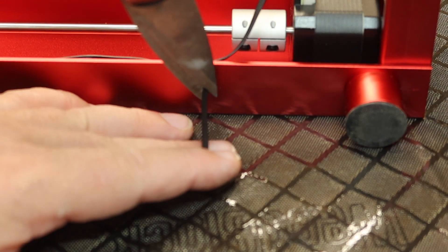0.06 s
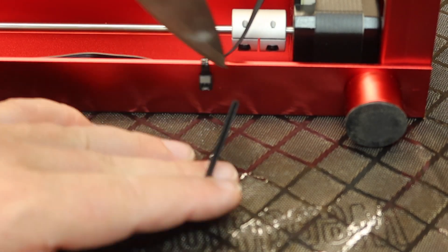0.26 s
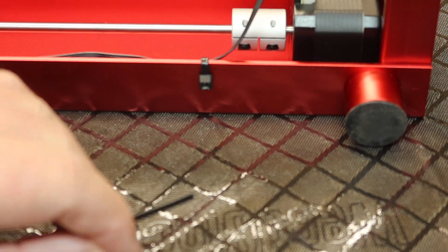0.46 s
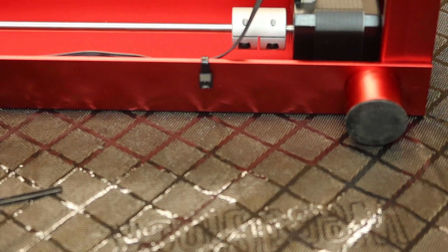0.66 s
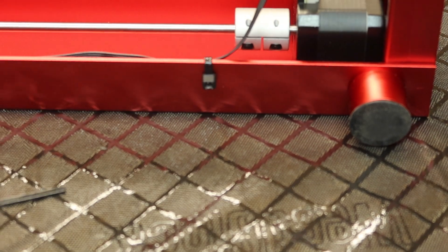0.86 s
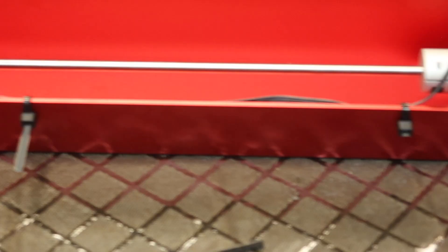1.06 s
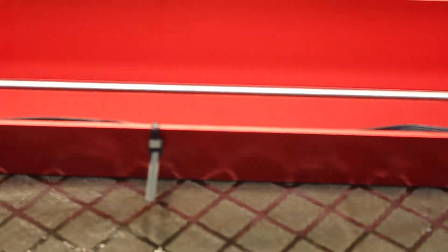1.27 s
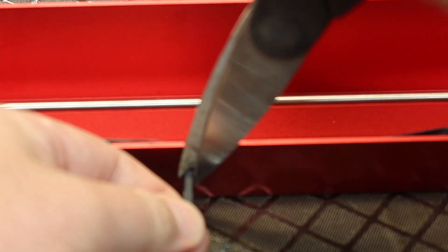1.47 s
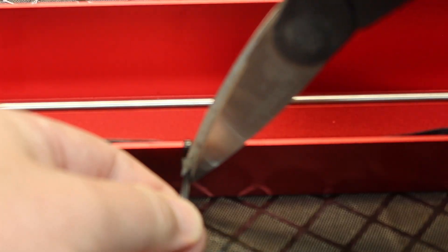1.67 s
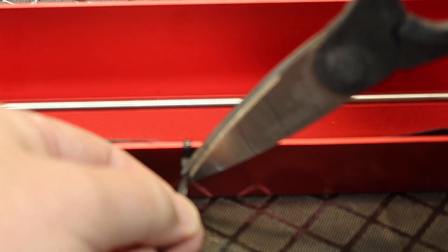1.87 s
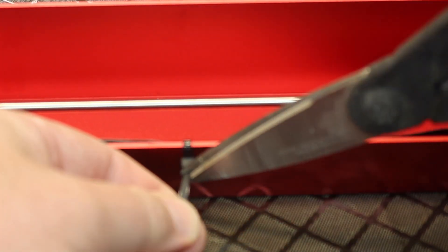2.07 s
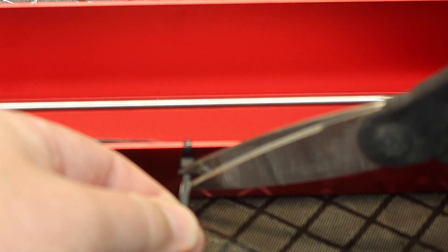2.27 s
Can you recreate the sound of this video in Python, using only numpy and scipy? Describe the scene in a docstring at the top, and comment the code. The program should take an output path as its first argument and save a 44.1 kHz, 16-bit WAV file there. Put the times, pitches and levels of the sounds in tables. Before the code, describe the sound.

Scissors snip a plastic zip tie with a sharp snap at 0.2 seconds, then knock briefly. A hand rubs softly over a cloth mat from about 0.5 seconds, with a few dry ticks. From 0.9 to 1.3 seconds the microphone's mount scrapes, judders and squeaks, stopping with a clunk at 1.4. Around 2 seconds the blades crunch faintly into another tie. Everything is close, in a small quiet room.

```python
"""Scissors snip a plastic zip tie on a metal frame, close to a camera's microphone in a small quiet room.
The blades squeeze, snap through and knock; a hand slides away over a cloth mat; the camera mount is
swung round with a juddering scrape and a clunk; fingers take the next tie and the blades bite into it.
Blows are a crack plus ringing modes, friction is a stream of tiny slips.
The recorder's limiter ducks the room after each loud sound."""
import sys
import numpy as np
from scipy import signal
from scipy.fft import rfft, irfft
from scipy.io import wavfile
from scipy.ndimage import uniform_filter1d, minimum_filter1d

SR = 44100
rng = np.random.default_rng(int(sys.argv[2]) if len(sys.argv) > 2 else 0)


def store_pcm(level_fs):
    """Save levels as 16-bit WAV."""
    pcm = np.round(np.clip(level_fs, -1, 1) * 32767).astype(np.int16)
    wavfile.write(sys.argv[1], SR, np.atleast_2d(pcm).T)


N = 101429
T = np.arange(N) / SR


# the ring of the cut, close to the microphone (frequency [Hz], level [dB], t60 [s])
CUT_MODES = [(110, -13, .012), (830, -12, .035), (1430, 1, .011), (1840, -4, .008), (2950, -5, .006),
             (4120, 3, .008), (4600, 2, .007), (6000, -5, .006), (6770, -5, .005)]
# the bright snap of the plastic (frequency [Hz], level [dB])
SNAP_SPECTRUM = [(5000, -17), (8000, -3), (10500, -8), (13000, -7.5), (15000, -30), (16000, -44)]
def snip():
    """The tie tears through with a ringing blow and a bright snap."""
    cut = blow(.2032, CUT_MODES, db=-22, rise_s=.0004, crack_db=-7, crack_s=.0006, hold_s=.0018)
    snap = amp(-27) * dying(T[:SR // 50], hold_s=.001, decay_s=.0006)
    add(cut, .2033, colour(snap * rng.standard_normal(len(snap)), SNAP_SPECTRUM))
    return cut


# the scissors' ring (frequency [Hz], level [dB], t60 [s])
SCISSOR_MODES = [(460, -8, .045), (620, -6, .04), (980, -8, .04), (1105, -4, .046), (1755, -3, .032),
                 (1885, -5, .036), (2010, -3, .04), (2185, -5, .025), (3080, -2, .018), (3950, -6, .022),
                 (5590, -8, .026), (5820, -11, .02), (8450, -19, .02), (10300, -15, .006),
                 (12400, -21, .005)]
# their rebounds at the frame (time [s], level [dB], relative crack level [dB])
REBOUNDS = [(.2937, -28, 4), (.29642, -35, 5), (.30275, -41, 2)]
def knocks():
    """The freed scissors knock and chatter to rest."""
    return sum(blow(s, SCISSOR_MODES, db, rise_s=.0001, crack_db=crack_db, crack_s=.004)
               for s, db, crack_db in REBOUNDS)


# the crack of a hard contact at close range (frequency [Hz], level [dB])
CRACK_SPECTRUM = [(60, -34), (350, -1), (1500, 1.5), (4500, -2.5), (7000, -10.5), (11000, -20.5),
                  (16000, -51)]
def blow(s, modes, db, rise_s, crack_db, crack_s, hold_s=0):
    """One blow: a short crack and the dying modes of what was struck."""
    t, out = T[:SR // 5], np.zeros(N)
    ring = sum((-1) ** k * amp(gain) * dying(t, hold_s, t60 / np.log(1000)) * np.sin(2 * np.pi * hz * t)
               for k, (hz, gain, t60) in enumerate(modes))
    crack = colour(rng.standard_normal(len(t)) * dying(t, hold_s, crack_s), CRACK_SPECTRUM)
    onset = 1 - np.exp(-t / rise_s)
    add(out, s, amp(db) * onset * (ring + amp(crack_db) * crack))
    return out


# blade passing blade (frequency [Hz], level [dB])
SHEAR_SPECTRUM = [(100, -5), (300, 7), (850, 5), (1300, 0), (2400, 2), (4300, 1), (6500, -5), (8000, -23),
                  (16000, -39)]
def shear(start_s=.205, db=-30, decay_s=.017):
    """After the snap, steel slides on steel with a hiss that dies away."""
    stroke = np.zeros(N)
    add(stroke, start_s, amp(db) * np.exp(-T / decay_s))
    return colour(stroke * rng.standard_normal(N), SHEAR_SPECTRUM)


# blades pressing into the first tie (time [s], length [s], level [dB])
PRESSES = [(-.03, .225, -63), (.193, .012, -48)]
# their thin hiss, heard close up (frequency [Hz], level [dB])
BLADE_SPECTRUM = [(100, -12), (300, -2.5), (650, 9), (1300, -5.5), (2200, -4.5), (3300, 0.5), (6000, -6),
                  (9000, -16.5), (16000, -24)]
# their faint singing at the next tie (time [s], level [dB])
SING_LEVELS = [(2.232, -86), (2.243, -70), (2.3, -66.5)]
# their resonances when pressing and when singing (frequency [Hz], width [Hz], boost [dB])
PRESS_PEAKS = [(4200, 320, 7), (5400, 57, 2)]
SING_PEAKS = [(3915, 90, 17)]
def blades(release_s=.028):
    """Steel creeps through plastic before the cut; at the end the blades sing faintly as they rub."""
    press = sum(amp(db) * np.clip(np.minimum((T - s) * 4, s + length - T + release_s) / release_s, 0, 1)
                for s, length, db in PRESSES)
    creep = colour(press * grains(per_s=2000, spread_db=3, smooth=1), BLADE_SPECTRUM, PRESS_PEAKS)
    sing = colour(level(SING_LEVELS) * rng.standard_normal(N), BLADE_SPECTRUM, SING_PEAKS)
    return creep + sing


# the crunch into the next tie, and the catches of the edge (time [s], level [dB])
CRUNCH_LEVELS = [(1.972, -75), (1.983, -55), (1.988, -52), (2.008, -54), (2.03, -57.5), (2.05, -83)]
EDGE_CATCHES = [(1.9884, -36), (1.9906, -32), (1.9949, -29), (2.0089, -24), (2.0328, -37)]
# the tone of both (frequency [Hz], level [dB])
BITE_SPECTRUM = [(100, -2), (400, 8), (900, 3.5), (2000, 5), (4500, -0.5), (7000, -11.5), (11000, -19),
                 (16000, -28)]
def bite():
    """The blades crunch into the next tie, their edge catching in dry snicks."""
    friction = level(CRUNCH_LEVELS) * grains(per_s=1700, spread_db=2.5, smooth=.34)
    for s, db in EDGE_CATCHES:
        add(friction, s, amp([db]))
    return colour(friction, BITE_SPECTRUM)


# small contacts near the microphone (time [s], level before the low cut [dB], low cut [Hz], decay [s])
CONTACTS = [(0.82, -37, 2000, 0.0015), (0.873, -38, 6500, 0.018), (0.9325, -28.5, 4800, 0.0032),
            (1.399, -27.5, 6440, 0.0024), (1.562, -44, 3000, .002), (1.621, -43, 2500, .001)]
# their tone (frequency [Hz], level [dB])
TICK_SPECTRUM = [(200, 16), (1500, 4.5), (4500, 0), (7000, -9.5), (11000, -16.5), (16000, -41)]
def ticks():
    """Plastic and blade touch in brief dry ticks."""
    t, out = T[:SR // 20], np.zeros(N)
    for s, db, low_hz, decay_s in CONTACTS:
        burst = colour(rng.choice([-1, 1], len(t)) * np.exp(-t / decay_s), TICK_SPECTRUM)
        low_cut = signal.butter(2, low_hz, "high", fs=SR)
        add(out, s, amp(db) * signal.lfilter(*low_cut, burst))
    return out


# the mount sliding, right at the camera (time [s], level [dB])
SLIDE_LEVELS = [(.92, -84), (.945, -51.5), (.975, -43.5), (.99, -50), (1.012, -46), (1.036, -48),
                (1.05, -45), (1.085, -42), (1.102, -46), (1.11, -59.5), (1.135, -46), (1.175, -45),
                (1.215, -48.5), (1.236, -54), (1.262, -52), (1.285, -66.5), (1.352, -72), (1.366, -50),
                (1.388, -44), (1.402, -79), (1.42, -104)]
# its jolts (time [s], length [s], rasp [dB], groan [dB], squeak [dB], grit [dB])
MOUNT_JOLTS = [(.972, 0.0046, -47.5, -43.5, -69, -69), (1.003, 0.0055, -49, -41, -66, -64),
               (1.009, 0.01, -39.5, -36.5, -48, -58), (1.045, .012, -35, -44.5, -44, -39),
               (1.065, 0.012, -37.5, -56, -44, -48), (1.1552, 0.0015, -43, -64, -28, -56),
               (1.1622, 0.0059, -41.5, -51, -30.5, -66), (1.204, 0.0095, -59, -50, -63, -53.5),
               (1.244, 0.015, -44, -68, -46, -42)]
# resonances of its scrape and its low groan (frequency [Hz], width [Hz], boost [dB])
SCRAPE_PEAKS = [(714, 57, 8), (887, 39, 5), (1237, 45, 12), (1529, 53, 10.5), (1804, 54, 10),
                (2600, 52, 11), (3145, 43, 7.5), (3453, 87, 9), (3713, 44, 9.5), (4300, 41, 8.5),
                (5020, 50, 5.5)]
GROAN_PEAKS = [(639, 50, 15), (898, 50, 23)]
# broad tone of its scrape and its gritty treble (frequency [Hz], level [dB])
SCRAPE_SPECTRUM = [(60, -23), (250, 2), (700, -3), (1500, 0), (2200, 1.5), (3700, -1), (5000, -8.5),
                   (7000, -20.5), (10000, -31.5), (16000, -60)]
GRIT_SPECTRUM = [(1500, -7), (3500, 13.5), (6000, 1), (8000, -12.5), (11000, -16), (16000, -35)]
def mount(judder_hz=305, judder_depth=.51, squeak_hz=2580, squeak_s=.0012):
    """The camera mount sticks and slips in juddering rasps; some groan, some squeak, some are gritty."""
    force, t = level(SLIDE_LEVELS), T[:SR // 10]
    groan, squeaks, grit = np.zeros((3, N))
    squeak = t / squeak_s * np.exp(1 - t / squeak_s) * np.sin(2 * np.pi * squeak_hz * t)
    for s, length, rasp_db, groan_db, squeak_db, grit_db in MOUNT_JOLTS:
        jolt = dying(t, hold_s=length, decay_s=.003)
        add(force, s, amp(rasp_db) * jolt)
        add(groan, s, amp(groan_db) * jolt)
        add(grit, s, amp(grit_db) * jolt)
        add(squeaks, s, amp(squeak_db) * squeak)
    wander = unit(uniform_filter1d(rng.standard_normal(N), size=200))
    cycles = np.cumsum(judder_hz * (1 + .2 * wander)) / SR
    judder = unit(1 + judder_depth * np.cos(2 * np.pi * cycles))
    slips = judder * grains(per_s=1900, spread_db=1.7, smooth=.61)
    scrape = colour(force * slips, SCRAPE_SPECTRUM, SCRAPE_PEAKS)
    low = colour(groan * rng.standard_normal(N), RUB_SPECTRUM, GROAN_PEAKS)
    treble = colour(grit * rng.standard_normal(N), GRIT_SPECTRUM)
    return scrape + squeaks + low + treble


# the mount's ring as it stops (frequency [Hz], level [dB], t60 [s])
STOP_MODES = [(272, -18, 0.06), (816, 1, 0.012), (1200, -1.5, 0.016), (1500, 7, 0.014),
              (2220, -11.5, 0.031), (3110, 1, 0.017), (3530, 0, 0.015), (4350, -11.5, 0.026),
              (5090, -11, 0.016)]
def clunk():
    """The mount ends its swing with one blow."""
    return blow(1.3773, STOP_MODES, db=-22, rise_s=.0012, crack_db=-10.5, crack_s=.0058)


# the hand on mat and tie, near the microphone (time [s], low rub [dB], hiss [dB])
HAND_LEVELS = [(0, -58.5, -66), (.19, -65, -97), (.34, -66, -62), (.432, -58, -63.5), (.506, -53, -56.5),
               (.562, -41.5, -49), (.61, -48, -55), (.646, -59.5, -58), (.686, -47, -59.5),
               (.752, -49.5, -60.5), (.812, -39.5, -51), (.838, -43.5, -58), (.865, -55, -60),
               (.92, -61, -61.5), (.98, -45.5, -53), (1.1, -59, -64.5), (1.23, -52.5, -60.5),
               (1.29, -66.5, -66), (1.43, -64.5, -76), (1.512, -52.5, -61.5), (1.7, -56, -68),
               (1.744, -68, -73), (1.8, -60.5, -72.5), (1.916, -59, -70), (1.96, -60, -70.5),
               (2.012, -54, -65.5), (2.087, -57.5, -69), (2.18, -67.5, -76), (2.215, -62, -74),
               (2.3, -66.5, -83)]
# low rub (also under the mount's groan), finger grip and skin hiss (frequency [Hz], level [dB])
RUB_SPECTRUM = [(25, -39), (60, -21.5), (130, 1.5), (220, -1.5), (480, -6), (800, -11.5), (1500, -24.5),
                (4000, -48)]
GRIP_SPECTRUM = [(25, -30), (55, -15.5), (100, 2), (250, -7.5), (800, -21.5), (1500, -35.5), (4000, -42)]
SKIN_SPECTRUM = [(200, -15), (800, -1.5), (1500, 3.5), (2300, -1), (3500, 1), (5000, -3.5), (8000, -11),
                 (12000, -20.5), (16000, -49.5)]
def hand(grip_from_s=1.35):
    """Skin slides over the woven mat; later the fingers grip the tie with duller bumps."""
    push = level(HAND_LEVELS) * rng.standard_normal(N)
    rub = colour(push * (T < grip_from_s), RUB_SPECTRUM)
    grip = colour(push * (T >= grip_from_s), GRIP_SPECTRUM)
    slips = level(HAND_LEVELS, column=2) * grains(per_s=1400, spread_db=2, smooth=.81)
    return rub + grip + colour(slips, SKIN_SPECTRUM)


# the small room's decay (frequency [Hz], t60 [s])
ROOM_DECAY = [(150, 0.15), (800, 0.09), (4000, 0.13), (7000, 0.096), (12000, 0.24)]
# its reflections at the microphone (frequency [Hz], level [dB])
ROOM_SPECTRUM = [(100, -3), (800, -2.5), (1500, -7), (3000, -7), (6500, 2.5), (8500, -8.5), (16000, -8)]
def room(x, wet_db=-15, gap_s=.0016):
    """A small furnished room returns a short, soft tail."""
    hz, t, noise = signal.stft(rng.standard_normal(SR // 3), SR, nperseg=256)
    decay = amp(-60 * t / read(ROOM_DECAY, hz)[:, None])
    tail = signal.istft(noise * decay, SR, nperseg=256)[1]
    onset = np.clip(T[:len(tail)] / gap_s - 1, 0, 1)
    tail = colour(tail * onset, ROOM_SPECTRUM)
    return amp(wet_db) * signal.fftconvolve(x, tail / np.linalg.norm(tail))[:N]


# the quiet room all around the microphone (frequency [Hz], level [dB])
AIR_SPECTRUM = [(20, -25), (45, -17.5), (90, 19.5), (130, 1.5), (260, 0), (450, -12), (1000, -7),
                (2200, -24.5), (5000, -11), (9000, -15), (13000, -19), (16000, -20.5)]
# a dip in its level (time [s], gain [dB])
AIR_DIP = [(1.03, -3), (1.12, -13), (1.33, -10), (1.41, -4)]
def room_tone(db=-64):
    """A low rumble and a faint hiss; the level dips briefly."""
    dip_db = np.interp(T, *np.transpose(AIR_DIP))
    return amp(db + dip_db) * colour(rng.standard_normal(N), AIR_SPECTRUM)


def grains(per_s, spread_db, smooth):
    """Friction: tiny slips of uneven size over a smooth hiss."""
    size = amp(spread_db * np.minimum(rng.exponential(1, N), 3.5))
    slips = rng.choice([-1, 1], N) * size * (rng.random(N) < per_s / SR)
    return unit(unit(slips) + smooth * rng.standard_normal(N))


def colour(x, spectrum, peaks=()):
    """Minimum-phase filter of unit energy: a broad spectrum with resonances on top."""
    bins = np.fft.rfftfreq(4096, 1 / SR)
    db = read(spectrum, bins) + sum(gain / (1 + ((bins - hz) / width) ** 2) for hz, width, gain in peaks)
    cepstrum = irfft(np.log(amp(db)))
    half = len(cepstrum) // 2
    cepstrum[1:half] *= 2
    cepstrum[half + 1:] = 0
    taps = irfft(np.exp(rfft(cepstrum)))[:half]
    return signal.fftconvolve(x, taps / np.linalg.norm(taps))[:len(x)]


def amp(db):
    """Decibels to gain."""
    return 10 ** (np.asarray(db) / 20)


def unit(x):
    """Scales to an rms of one."""
    return x / np.sqrt(np.mean(x ** 2) + 1e-20)


def read(points, hz):
    """Reads a curve on a log-frequency axis."""
    f, value = np.transpose(points)
    return np.interp(np.log(hz + 1), np.log(f), value)


def level(rows, column=1):
    """A dB curve as gain over time, silent outside its span."""
    rows = np.array(rows)
    return amp(np.interp(T, rows[:, 0], rows[:, column], left=-120, right=-120))


def dying(t, hold_s, decay_s):
    """Holds, then dies away."""
    return np.exp(-np.maximum(t - hold_s, 0) / decay_s)


def add(mix, s, sound):
    """Mixes a sound in at a time."""
    part = mix[max(round(s * SR), 0):][:len(sound)]
    part += sound[:len(part)]


def scene():
    """All is close and central; the two sides differ only by a faint wash far below the rest."""
    scissors = snip() + knocks() + shear() + blades() + bite()
    near = scissors + ticks() + mount() + clunk() + hand()
    mid = near + room(near) + room_tone()
    faint_hiss = amp(-90) * colour(rng.standard_normal(N), [(4000, -.5), (12000, 7)])
    side = amp(-59) * room(near) + faint_hiss
    return np.array([mid + side, mid - side])


def record(dry, limit_db=-21.3, attack_s=.0003, recover_db_per_s=88, edge_hz=15900):
    """The recorder: a fast look-ahead limiter with a steady recovery, then the band limit."""
    over_db = np.maximum(20 * np.log10(abs(dry).max(0) + 1e-9) - limit_db, 0)
    ahead_db = -minimum_filter1d(-over_db, size=25)
    recovery_db = T * recover_db_per_s
    held_db = np.maximum.accumulate(ahead_db + recovery_db) - recovery_db
    pole = np.exp(-1 / (attack_s * SR))
    duck_db = signal.lfilter([1 - pole], [1, -pole], held_db)
    low_pass = signal.firwin(401, edge_hz, window=("kaiser", 8), fs=SR)
    return signal.oaconvolve(dry * amp(-duck_db), low_pass[None], "same", axes=1)


dry = scene()
out = record(dry)
store_pcm(out)
```